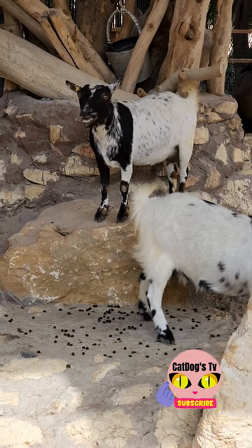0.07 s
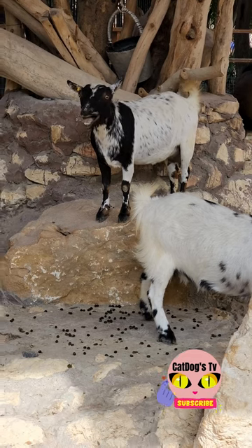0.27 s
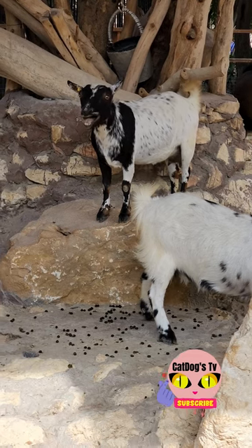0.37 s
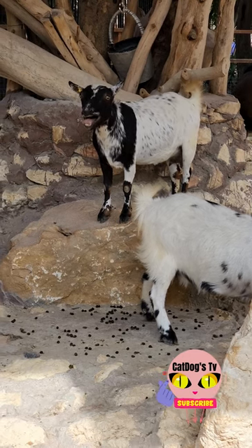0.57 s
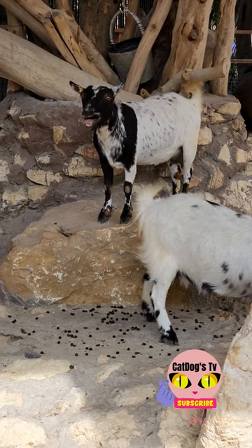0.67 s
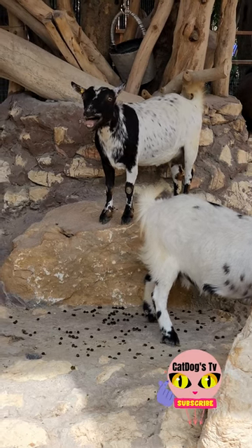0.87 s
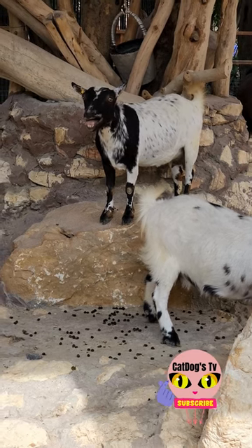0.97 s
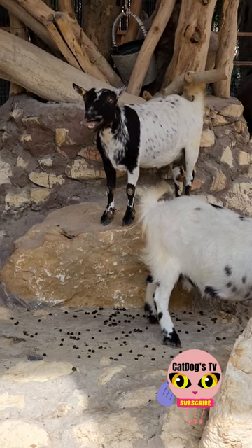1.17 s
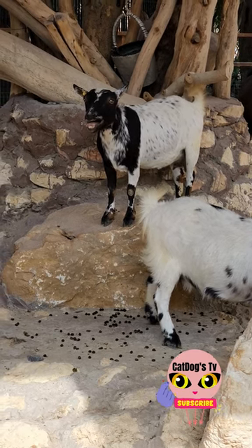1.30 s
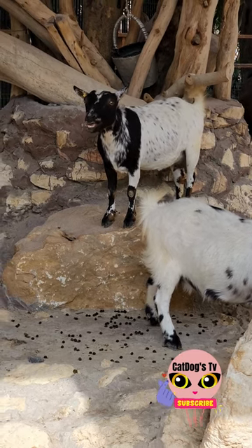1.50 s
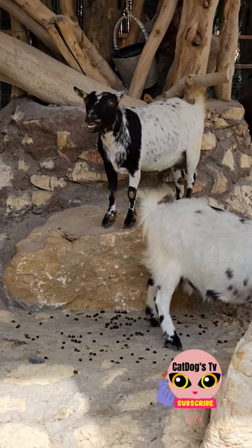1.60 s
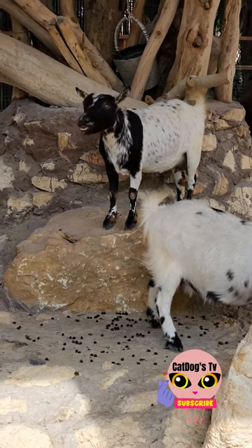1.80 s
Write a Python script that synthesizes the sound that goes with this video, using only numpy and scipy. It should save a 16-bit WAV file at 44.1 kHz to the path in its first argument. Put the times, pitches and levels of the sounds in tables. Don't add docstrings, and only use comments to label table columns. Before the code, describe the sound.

A goat bleats in a hoarse quick stutter, then a loud sustained cry ending in sobs

```python
import sys
import numpy as np
from scipy import signal
from scipy.fft import rfft, irfft
from scipy.io import wavfile
from scipy.ndimage import uniform_filter1d

SR = 44100
rng = np.random.default_rng(int(sys.argv[2]) if len(sys.argv) > 2 else 0)


def convert_level_to_amplitude(level_db):
    exponent = np.asarray(level_db, float) / 20
    return 10 ** exponent


def master_out(mix):
    frames = np.transpose(np.atleast_2d(mix))
    ceiling = np.clip(frames, -1, 1)
    pcm = np.round(ceiling * 32767).astype(np.int16)
    wavfile.write(sys.argv[1], SR, pcm)


N = 81585
t = np.arange(N) / SR

# [f/Hz, density/dB per Hz]
YARD_SPECTRUM = [(30, -8.5), (90, -5), (200, -17), (600, -19.5), (1400, -28), (3000, -26), (7000, -37),
                 (15000, -62)]
# [t/s, f/Hz, level/dB]
DRONE = [
    (0, 349.3, -41),
    (.12, 360.2, -53),
    (.2, 361.5, -36.5),
    (.4, 369.7, -27),
    (.7, 366.7, -28.5),
    (.88, 365.1, -23.5),
]
# [multiple, level/dB]
DRONE_HARMONICS = [(2, -11), (3, -2), (4, -2), (5, -17), (6, -9)]
# [t/s, length/s, level/dB, f/Hz, roughness/0-1]
BURSTS = [
    (.095, 0.053, -29, 368.8, 0.49),
    (.2, 0.05, -22.5, 373.7, 0.31),
    (.31, 0.052, -20, 368.9, 0.32),
    (.42, 0.037, -19.5, 378.9, 0.36),
    (.525, 0.056, -19.5, 379.6, 0.3),
    (.645, 0.059, -21.5, 431, 0.9),
    (.75, .065, -19, 430.5, 0.9),
    (.855, .06, -22.5, 430.3, 0.83),
]
# [multiple, level/dB]
STUTTER_HARMONICS = [(1, -14), (2, -0.5), (3, -4.5), (4, 0.5), (5, -9.5), (6, -10), (7, -13), (8, -6.5),
                     (9, -8.5), (10, -7), (11, -27), (12, -40), (13, -17), (14, -9.5), (15, -39), (16, -58)]
# [f/Hz, width/Hz, level/dB]
STUTTER_THROAT = [(418, 22, -10.5), (736, 217, -7.5), (1435, 670, -6.5), (2230, 440, -14.5),
                  (3660, 2500, -3.5), (4470, 2500, -4), (5400, 870, -8)]
# [t/s, multiple, lift/dB, width/s]
STUTTER_SHIFTS = [(.132, 2, 7, .01), (.243, 2, 5, .01), (.232, 3, 5, .015), (.335, 3, 6, .012),
                  (.44, 3, 6, .01), (.552, 3, 4, .014), (.225, 6, 6, .012), (.33, 6, 5, .012),
                  (.432, 6, 9, .012)]
# [t/s, length/s, start f/Hz, end f/Hz, level/dB]
GRUNTS = [
    (0.1, 0.13, 164, 296, -34),
    (0.213, 0.31, 230, 164.7, -37.5),
    (0.418, 0.1, 253, 282, -36.5),
    (0.638, 0.217, 300.7, 279.8, -32.5),
]
# [t/s, f/Hz, level/dB]
HUM = [
    (.23, 383, -30.5),
    (.31, 385, -49),
    (.345, 385.5, -23.5),
    (.4, 383.7, -21),
    (.5, 387.7, -18),
    (.57, 394.3, -17.5),
    (.62, 397.7, -17.5),
    (.7, 385, -20.5),
    (.82, 378.2, -20.5),
]
# [multiple, level/dB]
HUM_HARMONICS = [(1, -9.5), (2, 1), (3, -38), (4, -5.5), (5, -4.5), (6, -8), (7, -11), (8, -41), (9, -22),
                 (10, -15), (11, -10.5), (12, -26.5)]
# [t/s, multiple, lift/dB, width/s]
HUM_SHIFTS = [(.35, 2, 8.5, .01), (.388, 2, 9, 0.0078), (.415, 2, -8, .008), (.49, 2, 1.5, 0.0049),
              (.502, 2, -27, 0.0047), (.525, 2, 6.5, 0.0059), (.575, 2, 13.5, 0.0041), (.63, 2, -9, 0.062),
              (.41, 5, -10, 0.013), (.473, 5, 0, 0.015), (.525, 5, -9, 0.012), (.628, 5, 4.5, 0.015),
              (.41, 6, -19, .015), (.45, 6, 13.5, 0.005), (.52, 6, 3, 0.018), (.605, 6, 5.5, 0.015),
              (.76, 6, 8, .04)]
# [t/s, lift of the fourth harmonic/dB]
RINGS = [
    (0.252, 24),
    (0.348, 21.5),
    (0.457, 20),
    (0.568, 16),
    (1.792, 17.5),
]
# [t/s, f/Hz, level/dB, lift of the fourth harmonic/dB]
CRY = [(.82, 354.8, -13.5, -3), (.86, 399.4, -10.5, 4.5), (.9, 402.8, -18, -3.5), (.95, 418, -7.5, 0.5),
       (.972, 388.4, -19, 7), (1.0, 419.7, -8, 0.5), (1.05, 415.3, -8.5, 2), (1.125, 423, -6.5, -4),
       (1.172, 428.9, -5, -15), (1.2, 437.3, -11.5, -2.5), (1.245, 395.3, -9.5, 5), (1.305, 396.3, -11, 0),
       (1.35, 412, -11, 3.5), (1.41, 418, -10, -1.5), (1.46, 391.1, -10, 2.5), (1.495, 389.5, -12, -3),
       (1.51, 361, -14, -6), (1.535, 409.3, -19.5, 14), (1.6, 406.2, -25, -33)]
# [t/s, roughness/0-1]
CRY_ROUGHNESS = [(.82, .4), (.87, .3), (.9, .6), (.95, .35), (1.0, .2), (1.04, .28), (1.08, .06),
                 (1.205, .06), (1.235, .4), (1.31, .4), (1.33, .55), (1.4, .7), (1.43, .45), (1.465, .2),
                 (1.495, .2), (1.52, .9)]
# [multiple, level/dB]
CRY_HARMONICS = [(1, -20.5), (2, -1.5), (3, -21), (4, -3.5), (5, -20.5), (6, -38.5), (7, -18.5), (8, -16.5),
                 (9, -28.5), (10, -36), (11, -19), (12, -18), (13, -28), (14, -52), (15, -71), (16, -48),
                 (17, -42), (18, -37), (19, -55), (20, -34.5), (21, -38), (22, -45.5)]
# [f/Hz, width/Hz, level/dB]
CRY_THROAT = [(448, 158, -9), (825, 187, 3), (1560, 730, -0.5), (2700, 920, -10), (3446, 480, 0),
              (4770, 1260, -7), (5483, 400, -7)]
# [t/s, multiple, lift/dB, width/s]
CRY_SHIFTS = [(1.195, 13, 18.5, 0.011), (1.19, 8, 6, .018), (1.16, 8, -17, 0.0073), (1.097, 7, -12, 0.044),
              (1.16, 7, 4.5, 0.034), (1.19, 6, 20, 0.031), (1.2, 5, 3, 0.032), (1.09, 12, -15, 0.057),
              (1.1, 3, 5, 0.0091), (1.405, 2, -22, 0.011), (1.415, 4, 5, 0.016)]
# [t/s, level/dB]
CATCHES = [(1.053, -3.5), (1.243, -5.5), (1.267, -0.5), (1.287, -0.5), (1.321, -19), (1.34, -4.5),
           (1.368, -16), (1.389, -9), (1.404, -5), (1.421, -6), (1.442, 1.5)]
# [t/s, length/s, level/dB, f/Hz, roughness/0-1]
SOBS = [
    (1.57, 0.066, -28.5, 411.7, 0.38),
    (1.664, 0.048, -24.5, 371.3, 0.38),
    (1.765, 0.041, -29, 392.8, 0.36),
]
# [t/s, multiple, lift/dB, width/s]
SOB_SHIFTS = [
    (1.79, 2, -12.5, 0.028),
    (1.73, 2, 10, 0.0094),
    (1.685, 2, 1.5, 0.0049),
]
# [f/Hz, width/Hz, level/dB]
TEETH = [(7270, 470, 2.5), (8460, 710, 4.5), (9420, 540, 2), (10450, 510, -5), (12230, 1300, 0.5),
         (14400, 1600, 0.5)]

DRONER = dict(late_ms=2.2, pan_db=-3.5, wall_db=-1.5, rasp_db=3, hiss_db=-70)
STUTTERER = dict(late_ms=.03, pan_db=0.37, wall_db=-6, rasp_db=4.54, hiss_db=-22.5)
HUMMER = dict(late_ms=.1, pan_db=0, wall_db=-9, rasp_db=1.8, hiss_db=-48)
CRIER = dict(late_ms=-0.12, pan_db=-0.5, wall_db=-7, rasp_db=0.5, hiss_db=-23)
SOBBER = dict(rasp_db=4, hiss_db=-17.5)

JITTER, JITTER_HZ, JITTER_SPAN = .04, 120, 1100
SHIMMER_DB, SHIMMER_HZ = 3, 80
BREAK_HZ, BREAK_OVER, BREAK_DB = 230, 1.35, -22
TOP_DB_PER_OCT = -14.5
GATE_CYCLES = 0.6
HISS_HZ, HISS_CLEAR = 6330, 0.46
TEETH_FLICKER_DB, TEETH_FLICKER_HZ = 4, 30
ATTACK_S, RELEASE_S, LEAK_DB = .026, 0.013, -17
RISE_PER_S, HOARSE = .8, .7
SWELL_DB, SWELL_S, SWELL_LATE_S = 15.5, 0.012, 0.03
RING_S, CATCH_S, SOB_RING_DB = 0.011, .003, -14
HUM_ROUGHNESS, DRONE_ROUGHNESS = 0.17, 0.35
YARD_DB, FLICKER_DB = -37.5, 3
RUMBLE_HZ, RUMBLE_WIDTH_HZ, RUMBLE_DB = 75.7, 29.7, -37.5
WALL_S, WALL_T60_S, WALL_HZ, WALL_WIDTH_HZ = .004, 0.19, 2045, 4950
PORT_HZ = 5800
NOTCH_HZ, NOTCH_WIDTH_HZ, NOTCH_SHARE = 426, 130, 0.46
DUCK_DB, DUCK_S = -9.5, 0.024
LIMIT, BASS_CUT_HZ = 1.06, 16


def level(x, db):
    return x * convert_level_to_amplitude(db) / np.sqrt(np.mean(x ** 2))


def band(x, hz, width):
    return signal.lfilter(*signal.iirpeak(hz, hz / width, fs=SR), x)


def twice_band(x, hz, width):
    return band(band(x, hz, width), hz, width)


def walk(rate_hz):
    hold = max(int(SR / rate_hz), 2)
    x = np.repeat(rng.standard_normal(N // 40)[:N // hold + 1], hold)
    return 1.4 * uniform_filter1d(uniform_filter1d(x, hold), hold)[:N]


def curve(rows, column):
    rows = np.array(rows, float)
    return np.interp(t, rows[:, 0], rows[:, column])


def ends(rows):
    return np.clip(np.minimum(t - rows[0][0], rows[-1][0] - t) / 0.013, 0, 1)


def bump(s, width):
    return np.exp(-.5 * ((t - s) / width) ** 2)


def rings():
    return sum(db * bump(s, RING_S) for s, db in RINGS)


def vocal_folds(phase, rough, harmonics, ring_db, swell_db, shifts):
    flutter = [walk(SHIMMER_HZ) for _ in range(2)]
    broken = uniform_filter1d(1. * (walk(BREAK_HZ) > BREAK_OVER), 60)
    breaks = broken * np.clip(2 * rough - .2, 0, 1)
    last, last_db = harmonics[-1]
    upper = [(m, last_db + TOP_DB_PER_OCT * np.log2(m / last)) for m in range(int(last) + 1, 37)]
    harmonics = list(harmonics) + upper
    norm = np.sqrt(sum(convert_level_to_amplitude(2 * db) for _, db in harmonics) / 2)
    tone = 0
    for m, db in harmonics:
        lift = sum(rise * bump(s, width) for s, k, rise, width in shifts if round(k) == m)
        gain_db = db + lift + SHIMMER_DB * rough * flutter[m > 4]
        gain_db = gain_db + ring_db * (m == 4) + swell_db * (m in (2, 3))
        spread = (m > 4) * m * m
        tone = tone + convert_level_to_amplitude(gain_db) * np.cos(2 * np.pi * m * phase + spread)
    return convert_level_to_amplitude(BREAK_DB * breaks) * tone / norm


def breath(phase, throat):
    puffs = np.exp(-(phase % 1) / GATE_CYCLES)
    air = puffs * rng.standard_normal(N) * convert_level_to_amplitude(SHIMMER_DB * np.clip(walk(SHIMMER_HZ), -2, 1.5) / 2)
    rasp = 0
    for k, (hz, width, db) in enumerate(throat):
        rasp = rasp + (-1) ** k * convert_level_to_amplitude(db) * level(twice_band(air, hz, width), 0)
    whistle = 0
    for hz, width, db in TEETH:
        flicker_db = TEETH_FLICKER_DB * walk(TEETH_FLICKER_HZ)
        whistle = whistle + convert_level_to_amplitude(db + flicker_db) * level(twice_band(air, hz, width), 0)
    hiss = signal.sosfilt(signal.butter(4, HISS_HZ, "high", fs=SR, output="sos"), whistle)
    return rasp, hiss


def voice(hz, rough, harmonics, throat, goat, ring_db=0, swell_db=0, shifts=()):
    wobble = walk(JITTER_HZ)
    wobble = wobble - uniform_filter1d(wobble, JITTER_SPAN)
    phase = np.cumsum(hz * (1 + JITTER * rough * wobble)) / SR
    tone = vocal_folds(phase, rough, harmonics, ring_db, swell_db, shifts)
    rasp, hiss = breath(phase, throat)
    rasp = rough * level(rasp, goat["rasp_db"])
    hiss = (HISS_CLEAR + rough) * level(hiss, goat["hiss_db"])
    return np.sqrt(1 - rough ** 2) * tone + rasp + hiss


def yard():
    out, rows = 0, np.array(YARD_SPECTRUM)
    for hz in 40 * 2 ** np.arange(0, 8.6, .5):
        mid, side = (twice_band(rng.standard_normal(N), hz, hz / 2) for _ in range(2))
        db = np.interp(np.log(hz), np.log(rows[:, 0]), rows[:, 1]) + FLICKER_DB * walk(6.7)
        out = out + convert_level_to_amplitude(db) * (mid + min(hz / 990.0, .7) * side * np.array([[1], [-1]]))
    rumble = twice_band(rng.standard_normal(N), RUMBLE_HZ, RUMBLE_WIDTH_HZ)
    return level(out, YARD_DB) + level(rumble, RUMBLE_DB) * convert_level_to_amplitude(2 * walk(7.04))


def drone():
    tone = voice(curve(DRONE, 1), DRONE_ROUGHNESS, DRONE_HARMONICS, CRY_THROAT, DRONER)
    return ends(DRONE) * convert_level_to_amplitude(curve(DRONE, 2)) * tone


def stutter(rows, harmonics, throat, goat, ring_db=0, rise=1, shifts=()):
    gain, hz = np.zeros(N), np.zeros(N)
    for start, length, db, pitch, _ in rows:
        u = t - start
        attack = np.sin(np.pi / 2 * np.clip(u / ATTACK_S + 0.55, 0, 1)) ** 2
        release = np.exp(-np.clip(u - length, 0, None) / RELEASE_S)
        leak = convert_level_to_amplitude(LEAK_DB) * np.clip(u / ATTACK_S + 2, 0, 1) * (u < .13)
        gain = np.maximum(gain, convert_level_to_amplitude(db) * np.maximum(attack * release, leak))
        rising = pitch * (1 + rise * RISE_PER_S * np.clip(u - length / 2, -.04, .03))
        hz = np.where((u > -.01) | (hz == 0), rising, hz)
    rough = np.clip(curve(rows, 4), 0, .98)
    swells = sum(bump(row[0] + SWELL_LATE_S, SWELL_S) for row in rows if row[4] < HOARSE)
    swell_db = rise * SWELL_DB * (swells - .5)
    tone = voice(uniform_filter1d(hz, 300), rough, harmonics, throat, goat, ring_db, swell_db, shifts)
    return uniform_filter1d(gain, 200) * tone


def grunts():
    out = 0
    for start, length, from_hz, to_hz, db in GRUNTS:
        u = np.clip((t - start) / length, 0, 1)
        hz = (from_hz + (to_hz - from_hz) * u) * (1 + 0.11 * walk(60))
        tone = np.sin(2 * np.pi * np.cumsum(hz) / SR)
        out = out + convert_level_to_amplitude(db + 2.5 * walk(39.2)) * np.sin(np.pi * u) * tone
    return out * convert_level_to_amplitude(np.array([[-1.5], [1.5]]))


def hum():
    tone = voice(curve(HUM, 1), HUM_ROUGHNESS, HUM_HARMONICS, CRY_THROAT, HUMMER, rings(),
                 shifts=HUM_SHIFTS)
    return ends(HUM) * convert_level_to_amplitude(curve(HUM, 2)) * tone


def cry():
    held = voice(curve(CRY, 1), curve(CRY_ROUGHNESS, 1), CRY_HARMONICS, CRY_THROAT, CRIER,
                 curve(CRY, 3), shifts=CRY_SHIFTS)
    held = held * convert_level_to_amplitude(sum(db * bump(s, CATCH_S) for s, db in CATCHES))
    ring_db = rings() * (t > 1) + SOB_RING_DB
    sobs = stutter(SOBS, CRY_HARMONICS, CRY_THROAT[2:], SOBBER, ring_db, rise=0, shifts=SOB_SHIFTS)
    return ends(CRY) * convert_level_to_amplitude(curve(CRY, 2)) * held + sobs


def placed(x, goat):
    hz = np.arange(N // 2 + 1) / N * SR
    late_s = goat["late_ms"] / 1000 / (1 + (hz / PORT_HZ) ** 4)
    left = irfft(rfft(x) * np.exp(-2j * np.pi * hz * late_s), N)
    u = t[:SR // 3] - WALL_S
    wash = band(rng.standard_normal((2, len(u))), WALL_HZ, WALL_WIDTH_HZ)
    wash = wash * (u > 0) * convert_level_to_amplitude(-60 * u / WALL_T60_S)
    wash *= convert_level_to_amplitude(goat["wall_db"]) / np.sqrt(np.sum(wash ** 2, axis=1)[:, None])
    wet = signal.fftconvolve(x[None], wash, axes=1)[:, :N]
    left = left * convert_level_to_amplitude(goat["pan_db"] / 2) + wet[0]
    right = x * convert_level_to_amplitude(-goat["pan_db"] / 2) + wet[1]
    return np.array([left - NOTCH_SHARE * band(left, NOTCH_HZ, NOTCH_WIDTH_HZ), right])


def scene():
    stuttering = stutter(BURSTS, STUTTER_HARMONICS, STUTTER_THROAT, STUTTERER, shifts=STUTTER_SHIFTS)
    goats = placed(drone(), DRONER) + placed(stuttering, STUTTERER)
    goats = goats + placed(hum(), HUMMER) + placed(cry(), CRIER)
    loud = uniform_filter1d(np.abs(goats[0]), int(DUCK_S * SR))
    return goats + grunts() + yard() * convert_level_to_amplitude(DUCK_DB * loud)


def band_limit(x):
    return signal.sosfilt(signal.butter(12, 15960, fs=SR, output="sos"), x)


def record(dry):
    rounded = np.tanh(LIMIT * dry) / LIMIT
    mix = signal.lfilter(*signal.butter(2, BASS_CUT_HZ, "high", fs=SR), rounded)
    return band_limit(mix)


dry = scene()
out = record(dry)
master_out(out)
```